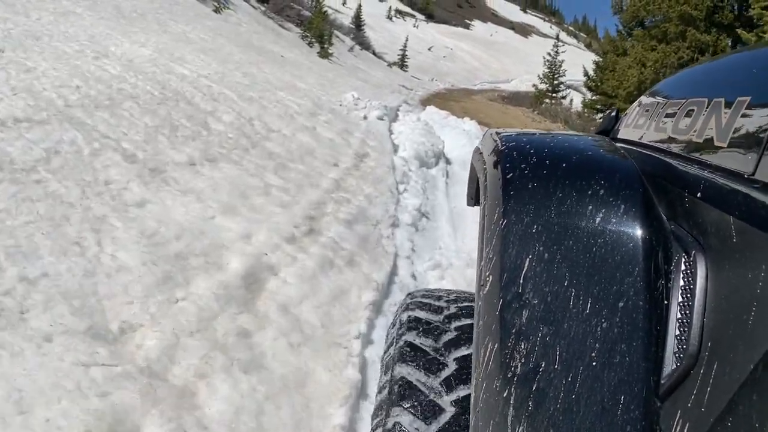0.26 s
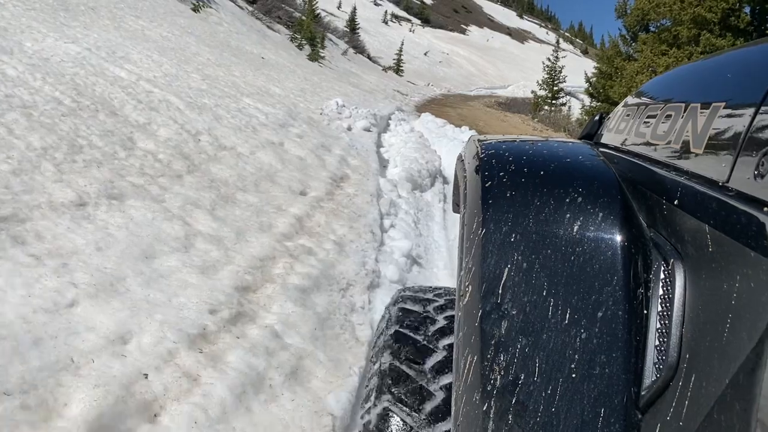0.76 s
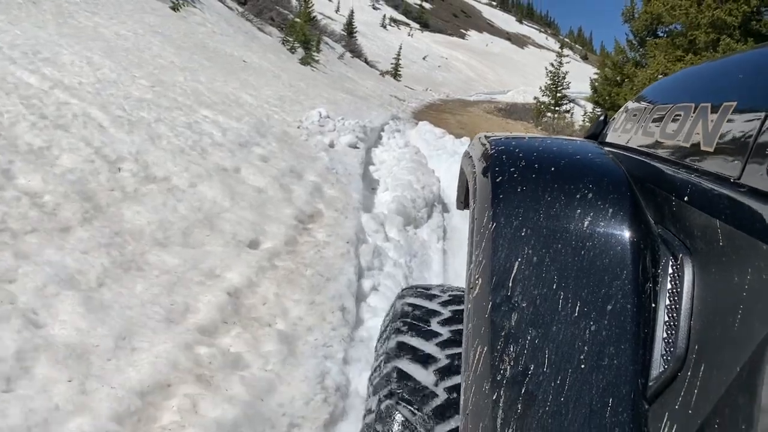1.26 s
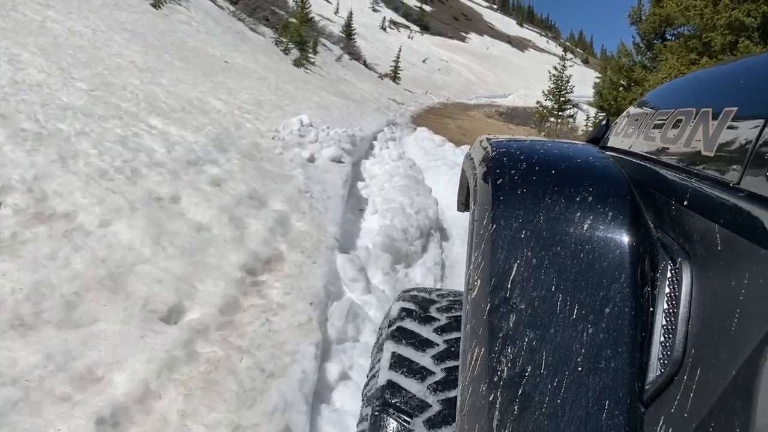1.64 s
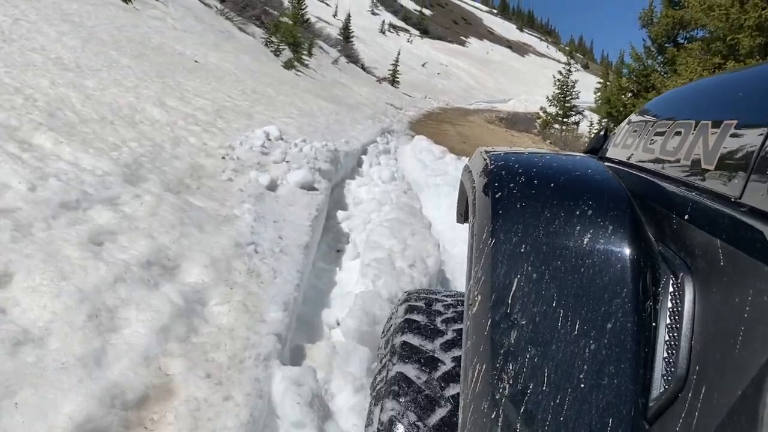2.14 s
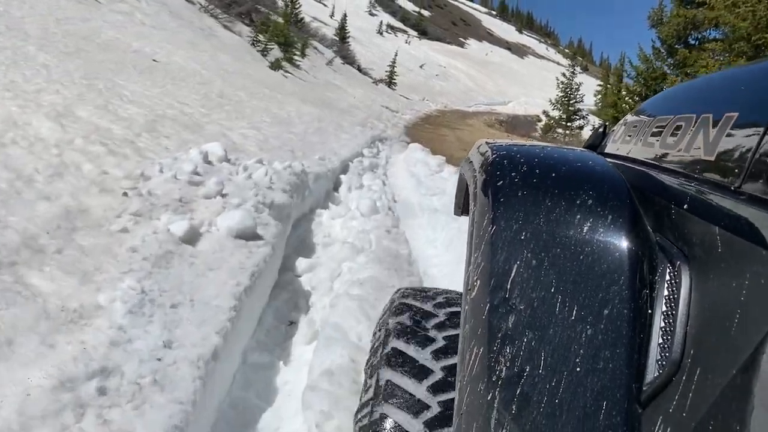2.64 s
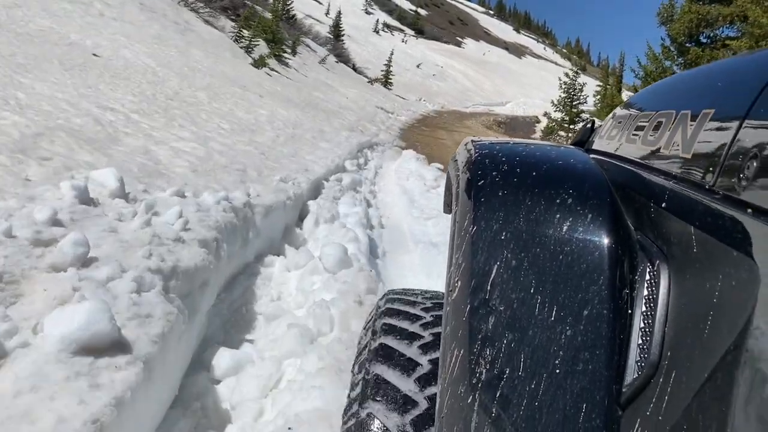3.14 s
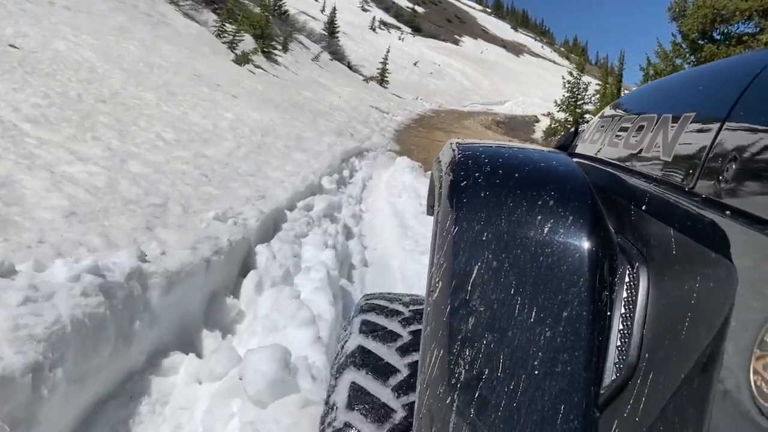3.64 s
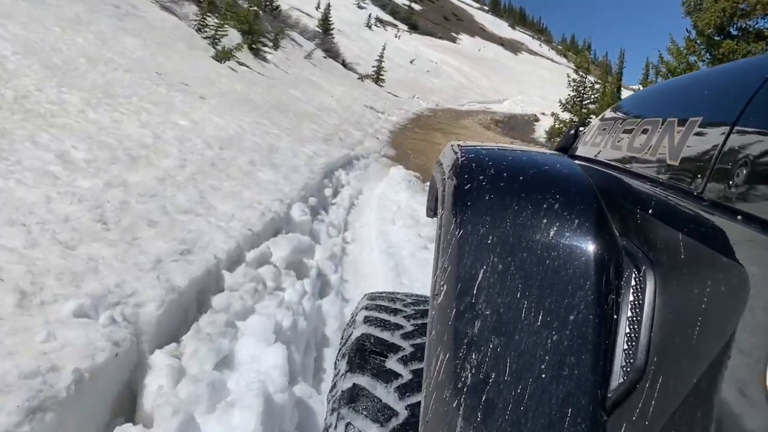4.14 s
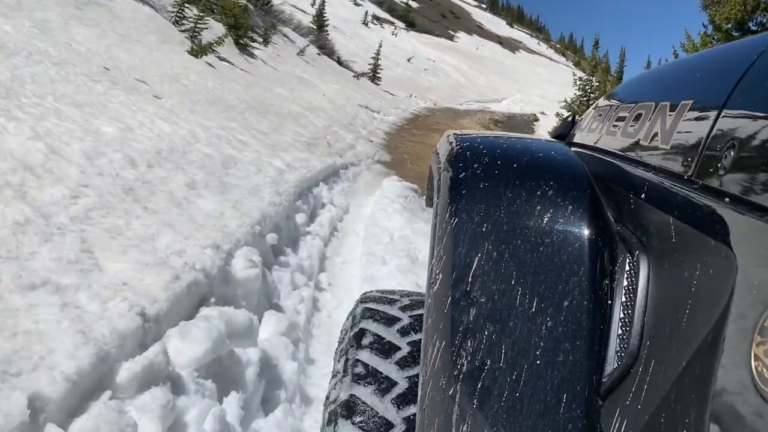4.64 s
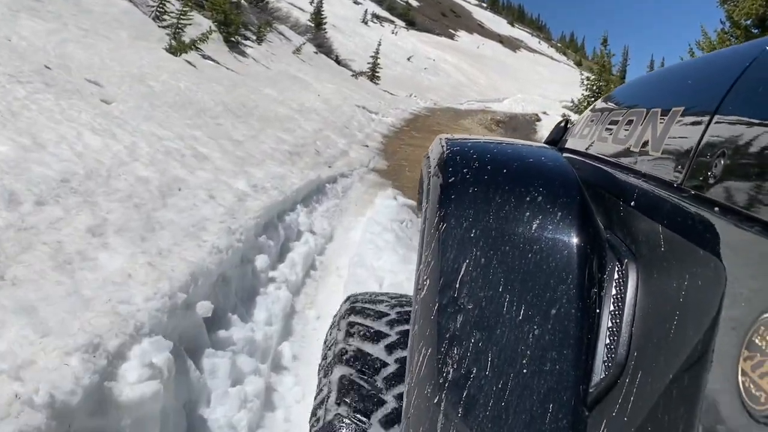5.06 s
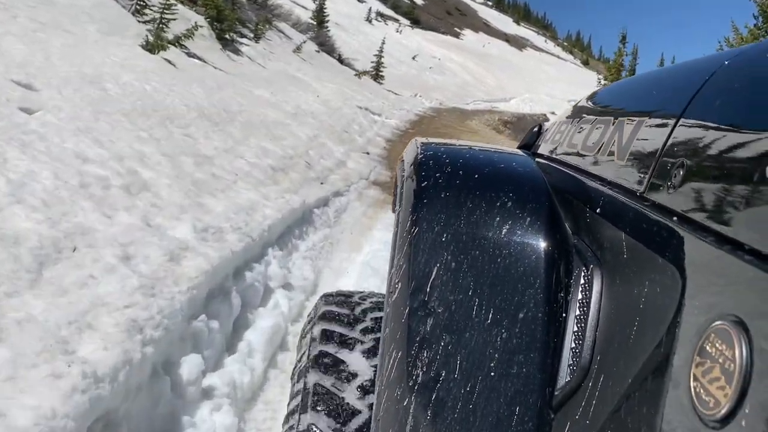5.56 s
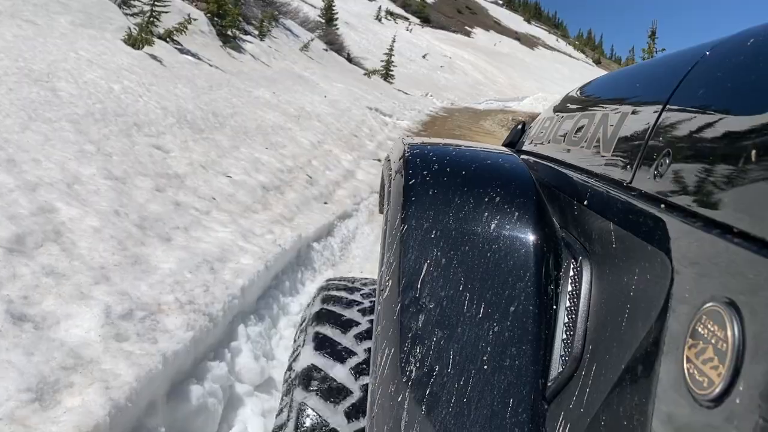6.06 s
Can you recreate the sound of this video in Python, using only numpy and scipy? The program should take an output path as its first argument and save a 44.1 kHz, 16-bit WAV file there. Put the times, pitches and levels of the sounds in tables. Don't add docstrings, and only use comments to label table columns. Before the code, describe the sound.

A six-cylinder engine pulls briefly then drops to idle as a tyre growls through packed snow and wind buffets the microphone.

```python
import sys
import numpy as np
from scipy import signal
from scipy.fft import rfft, irfft
from scipy.io import wavfile
from scipy.ndimage import uniform_filter1d

SR = 44100
rng = np.random.default_rng(int(sys.argv[2]) if len(sys.argv) > 2 else 0)


def waveform_to_disk(signal):
    frames = np.transpose(np.atleast_2d(signal))
    scaled = np.clip(frames, -1, 1) * 32767
    samples = np.round(scaled).astype(np.int16)
    wavfile.write(sys.argv[1], SR, samples)


def volts_from_db(level):
    exponent = np.asarray(level, float) / 20
    return 10 ** exponent


N = 277830

# start_s, turns_per_s
CRANK_SPEED = [(0, 18.7), (.16, 18.8), (.3, 18.95), (.46, 19.15), (.6, 19.27), (.78, 19.1), (.98, 18.7),
               (1.12, 18.0), (1.26, 17.0), (1.44, 15.9), (1.52, 15.45), (1.77, 15.0), (1.91, 14.4),
               (2.05, 13.9), (2.2, 13.6), (3.0, 13.35), (4.5, 13.45), (6.3, 13.5)]


def crankshaft():
    turns, = in_time(CRANK_SPEED)
    return turns, 2 * np.pi * np.cumsum(turns) / SR


# multiple_of_crank, level_db
LOW_ORDERS = [(2, -41), (3, -2), (4, -20)]
# multiple_of_crank, pulling_db, coasting_db
UPPER_ORDERS = [(5, 2, 0), (6, -8, -10), (7, -24, -22), (8, -9, -3), (9, -17, -18), (10, -10, -14),
                (11, 0, -12), (12, -4, -12), (13, -4, 0), (14, -6, -14), (16, 0, -9), (17, -4, -14),
                (19, -13, 0), (20, -9, -14), (21, -3, -10), (22, -10, -12), (24, -2, -20), (30, -11, -20)]
# start_s, level_db
LOW_LEVEL = [(0, -10.5), (.16, -8.5), (.24, -25), (.33, -11.5), (.6, -10.5), (.78, -18), (.9, -14),
             (1.1, -13), (1.3, -20), (1.5, -26), (1.8, -29), (2.2, -26), (3.5, -42), (4.9, -26), (5.2, -44),
             (6.3, -37)]
# start_s, level_db
UPPER_LEVEL = [(0, -35.5), (1.3, -35), (1.45, -38), (1.6, -44), (1.9, -52), (6.3, -52)]
# pitch_hz, width_hz, boost_db
EXHAUST_MODES = [(134.0, 26.0, 17), (458.0, 30.0, 4)]


def engine(crank):
    lift_off_s, lift_off_length_s = .8, .42
    closed = np.clip((np.arange(N) / SR - lift_off_s) / lift_off_length_s, 0, 1) ** 2

    def order_stack(orders, level):
        stack = 0
        for order, pull_db, coast_db in orders:
            start = rng.uniform(0, 2 * np.pi)
            lean_db = rng.normal(.5, 1.5) * (order > 4)
            strength = drift(3.0, db=1.2) * volts_from_db(pull_db + (coast_db - pull_db) * closed)
            tone = strength * np.sin(order * crank + start)
            stack = stack + tone * volts_from_db([[lean_db], [-lean_db]])
        return np.sqrt(2) * volts_from_db(in_time(level)[0]) * stack

    low = order_stack([(order, db, db) for order, db in LOW_ORDERS], LOW_LEVEL)
    upper = order_stack(UPPER_ORDERS, UPPER_LEVEL)
    return low + lifted(upper, EXHAUST_MODES)


# start_s, load_0_to_1
LOAD = [(0, 0.63), (.3, 0.77), (.6, 0.96), (1.05, 1.03), (1.22, 0.87), (1.42, 0.47), (2.1, 0.26),
        (2.6, 0.18), (4.9, 0.07), (5.1, 0.45), (5.4, 0.16), (6.3, 0.01)]
# pitch_hz, density_db_per_hz
BAY_COLOUR = [(500, -0.5), (700, -2), (1000, -3.5), (1350, -7.5), (1600, -8.5), (1880, -7), (2300, -11),
              (2800, -11), (3800, -14), (5000, -26), (6000, -14), (7500, -24), (9000, -30)]
# pitch_hz, width_hz, boost_db
BAY_MODES = [(1205, 30, 4), (1550, 90, 7), (1670, 70, 6), (1860, 110, 7), (2120, 160, 6), (3720, 70, 8),
             (4730, 200, 4)]


def bay(turns, crank):
    load, = in_time(LOAD)
    revs = np.clip((turns - 13.5) / 5.5, 0, 1)
    turn_beat = (.2 + .7 * revs) * (np.cos(crank) + .7 * np.cos(2 * crank))
    beat = volts_from_db(turn_beat + .9 * np.cos(3 * crank))
    plain = banded(BAY_COLOUR, grainy(3000, spread_db=3.5, smooth=1.4), patchy_db=.25)
    ringing = lifted(plain, BAY_MODES)
    clatter = plain + (.45 + .55 * revs) * (ringing - plain)
    treble = filtered(clatter, 2, 3300, "high")
    noise = rms_one(beat * (clatter + 0.47 * np.clip(load, 0, 2) ** 2 * treble))
    idle_db, load_db, fade_db_per_s = -36.5, 7, 0.39
    return volts_from_db(idle_db + load_db * load - fade_db_per_s * np.arange(N) / SR) * noise


# start_s, pitch_hz, level_db
GEAR = [(0, 1828, -41), (.12, 1840, -50), (.65, 1870, -43), (1.0, 1845, -46), (1.25, 1862, -46),
        (1.4, 1840, -54), (1.65, 1820, -48), (2.0, 1825, -53), (4.2, 1822, -52), (5.25, 1820, -48),
        (5.55, 1822, -54), (6.1, 1820, -49), (6.3, 1815, -50)]
# centre_s, pitch_hz, level_db, length_s
SINGS = [
    (.22, 1203, -46, .3),
    (.25, 1535, -47, .15),
    (.85, 1540, -48, .3),
    (.97, 1662, -46, .3),
    (5.19, 1600, -51, .1),
    (5.7, 1580, -54, .35),
]


def gear():
    hz, db = in_time(GEAR)
    out = volts_from_db(db) * drift(12.0, db=2.0) * np.sin(2 * np.pi * np.cumsum(hz) / SR + .9 * drift(8.0))
    for s, hz, db, length_s in SINGS:
        swell = bumps(np.array([s]), volts_from_db([db]), length_s)
        out = out + swell * np.sin(2 * np.pi * hz * np.arange(N) / SR + .8 * drift(6.0))
    return np.sqrt(2) * out * volts_from_db([[1.3], [-1.3]])


WHINE_HZ = [268.0, 474.0, 2170]
# wander_hz, level_db
WHINES = [(1.0, -38), (1.0, -40.5), (30, -56.5)]
# start_s, level_db
WHINE_LOAD = [(0, 2), (.5, 0.5), (1.0, 1.5), (1.6, 1), (2.5, 2.5), (4.7, 2), (5.25, 1), (5.5, -24),
              (6.3, -7)]


def whines():
    t = np.arange(N) / SR
    tones = 0
    for hz, (wander_hz, db) in zip(WHINE_HZ, WHINES):
        strength = volts_from_db(db) * drift(5.0, db=1.5)
        tones = tones + strength * np.sin(2 * np.pi * hz * t + 1.3 * drift(wander_hz))
    return np.sqrt(2) * tones * volts_from_db(in_time(WHINE_LOAD)[0]) * volts_from_db([[1.2], [-1.2]])


# start_s, spray_db, crush_db
ROLL = [(0.0, -49, -31), (0.02, -49, -31.5), (0.97, -47.5, -32), (1.39, -51, -31), (1.72, -50.5, -31.5),
        (2.39, -52, -32.5), (2.63, -50, -31), (3.19, -48.5, -32), (3.7, -49, -31), (3.83, -52.5, -33),
        (4.35, -48.5, -30.5), (4.93, -52.5, -31), (5.03, -48.5, -29), (5.21, -48.5, -35.5),
        (5.49, -50, -31.5), (5.77, -49.5, -30), (6.21, -52.5, -29.5), (6.3, -47.5, -27)]
# pitch_hz, density_db_per_hz
SNOW_COLOUR = [(210, -7), (270, -13), (400, -8.5), (500, -19.5), (640, -21), (900, -26), (1400, -37),
               (2000, -50)]
# pitch_hz, density_db_per_hz
SPRAY_COLOUR = [(4000, 4), (5600, -3), (7500, 3), (11000, 5.5), (14000, 3), (16000, -2)]
# centre_s, lift_db, length_s
CLUMPS = [
    (2.3, 3, .06),
    (2.744, 2.5, 0.065),
    (3.082, 5, 0.041),
    (5.02, 1.5, 0.048),
    (5.57, 2.5, 0.091),
]


def tyre():
    spray_db, crush_db = in_time(ROLL)
    snow = banded(SNOW_COLOUR, grainy(500, spread_db=3.5, smooth=1.0), patchy_db=0.4)
    crush = volts_from_db(crush_db + 1.83) * filtered(snow, 4, 205, "high")
    hiss = banded(SPRAY_COLOUR, grainy(2500, spread_db=2.5, smooth=1.2), patchy_db=0.5)
    return crush + volts_from_db(spray_db + 7 + bumps(*np.transpose(CLUMPS))) * hiss


# start_s, eddy_rate_hz, strength_db
WIND = [(0, 56.6, -37), (.25, 57, -8), (.6, 56.93, -11.5), (1.1, 57.76, -17.5), (1.5, 68.1, -15.5),
        (2.2, 67, -15), (2.65, 71, -14.5), (3.1, 63.07, -16), (3.6, 59.17, -13.5), (4.0, 68, -13.5),
        (4.42, 69.8, -13.5), (4.85, 59.5, -14.5), (5.03, 67, -14), (5.1, 67.4, -25), (5.45, 69.04, -21),
        (6.0, 59.87, -22.5), (6.26, 63, -21.5), (6.3, 63.5, -17)]
# centre_s, depth_db, length_s
LULLS = [(1.3, -12, 0.022), (1.588, -4, 0.026), (1.712, -5, 0.023), (1.785, -6, 0.045), (1.89, -2, 0.023),
         (1.987, -8, 0.024), (2.159, -15, 0.013), (2.232, -19, 0.039), (2.427, -11, 0.023),
         (2.843, -4, 0.021), (2.962, -1.5, 0.02), (3.151, -4, 0.031), (3.325, -11.0, 0.024),
         (3.548, -6, 0.032), (3.633, -15, 0.021), (3.88, -28, 0.032), (4.399, 1, 0.029), (4.481, -4, 0.046),
         (4.658, -13, 0.021), (4.756, -13, 0.016), (4.951, -8, 0.034), (5.112, 1.5, 0.033),
         (5.22, -8.0, 0.015), (5.367, -0.5, 0.06), (5.568, -9.0, 0.027), (5.698, -15, 0.026),
         (5.82, -9, 0.019), (5.885, -17, 0.021), (6.085, -15, 0.017), (6.172, -11, 0.022)]
# centre_s, peak_db, length_s
LUMPS = [(1.13, -20, 0.13), (1.29, -18.5, 0.036), (1.52, -19, 0.054), (1.613, -25, 0.046),
         (1.753, -14.5, 0.049), (1.819, -16.5, 0.038), (1.958, -19, 0.029), (2.017, -15.5, 0.036),
         (2.147, -14, 0.043), (2.405, -5.5, 0.017), (2.5, -17.5, 0.06), (2.74, -15, 0.043),
         (2.792, -15, 0.023), (2.853, -13, 0.03), (2.908, -13, 0.052), (3.078, -14.5, 0.045),
         (3.179, -14, 0.059), (3.381, -21, 0.06), (3.539, -11.5, 0.045), (3.865, -12.5, 0.077),
         (4.284, -14, 0.039), (4.334, -8.5, 0.026), (4.613, -11.5, 0.063), (4.742, -17, 0.03),
         (4.79, -14.5, 0.041), (4.989, -16, 0.037), (5.03, -7.5, 0.02), (5.58, -19.5, 0.043),
         (5.688, -20, 0.045), (5.978, -24.5, 0.19), (6.169, -23, 0.062)]
# centre_s, peak_db
FLUTTERS = [(1.595, -23), (1.742, -18.5), (1.909, -18.5), (2.08, -23), (2.189, -18.5), (2.399, -26),
            (2.638, -23), (2.742, -18), (2.824, -23), (2.906, -17.5), (3.065, -38), (3.282, -15),
            (3.391, -21), (3.532, -32), (3.752, -16.5), (4.122, -26), (4.262, -19.5), (4.352, -15),
            (4.612, -19.5), (4.772, -20), (4.895, -14.5), (5.03, -12), (5.144, -20.5), (5.401, -35),
            (5.706, -29), (5.76, -25), (5.868, -21), (6.013, -22), (6.09, -23), (6.168, -20), (6.25, -23)]


def buffet():
    t = np.arange(N) / SR
    eddy_hz, wind_db = in_time(WIND)
    rising = np.clip((t - .95) / .15, 0, 1)
    later = np.clip((t - .9) / .7, 0, 1)
    steady = volts_from_db(wind_db + 1.8 * bumps(*np.transpose(LULLS)))

    s, db, length_s = np.transpose(LUMPS)
    lump_gust = np.hypot(bumps(s, volts_from_db(db + 1.0), 0.72 * length_s), volts_from_db(wind_db - 6))
    s, db = np.transpose(FLUTTERS)
    flutter_gust = np.hypot(bumps(s, volts_from_db(db - 2.0), .033), volts_from_db(wind_db - 20))

    eddy_phase = 2 * np.pi * np.cumsum(eddy_hz + 2.5 * drift(4.0)) / SR
    port_phase = .4 * drift(9.0) + .14 * drift(6.0) * [[1], [-1]]
    drone = np.sqrt(2) * np.sin(eddy_phase + port_phase)
    lumps = lump_gust * evened(102.0, 22.5, 0.84)
    flutter = flutter_gust * later * evened(172.0, 40.0, 0.63)
    rush = steady * volts_from_db(-5.5) * narrow(64.0, 15.6, 0.9)
    heave = rising * volts_from_db(wind_db - 8.5) * narrow(50.0, 4.7, 1.0)
    air = rising * (steady * drone + lumps + flutter) + rush + heave
    return filtered(air, 3, 31, "high") * volts_from_db([[.2], [-.2]])


# start_s, peak_db, pitch_hz, bright_flick_db
PUFFS = [(1.363, -23, 205, -14), (1.551, -15.5, 264, -19), (1.735, -18, 191, -3), (1.885, -13.5, 236, -14),
         (1.9, -8, 213, -19), (1.938, -14.5, 355, -29), (2.069, -12.5, 200, -27), (2.185, -22, 265.8, -6),
         (2.548, -11, 224, -32), (2.906, -13, 295, -30), (3.272, -9.5, 212.4, -16), (3.527, -6, 201, -22),
         (3.567, -13, 209, -30), (3.842, -12.5, 263, -19), (4.114, -7.5, 216.3, -28),
         (4.259, -8.5, 187.8, -9), (4.315, -9.5, 192, -6.5), (4.657, -14, 360, -23),
         (4.784, -10.5, 287, -24), (4.816, -12, 278, -14), (4.89, -5, 203, -17), (4.92, -13.5, 266, -35),
         (5.008, -5, 186, -22), (5.138, -9, 260.3, 1.5), (5.395, -15, 222.8, -13), (5.636, -19.5, 273, -16),
         (5.867, -9.5, 235, -6), (6.085, -14.5, 262, 1.5), (6.128, -19, 281, -22), (6.159, -14, 220, 1)]
# start_s, peak_db, pitch_hz
FURTHER_PUFFS = [(1.213, -17, 335), (1.248, -16.5, 372), (1.506, -17, 210), (1.656, -19, 213),
                 (2.139, -23, 191), (2.17, -19, 218), (2.323, -16, 202), (2.572, -18, 328), (2.737, -15, 210),
                 (2.779, -20, 220.8), (2.864, -21, 326), (2.959, -16, 256), (3.085, -20, 269),
                 (3.386, -13.5, 227), (3.435, -24, 272), (3.745, -24, 191), (3.873, -12, 191),
                 (4.225, -26, 262), (4.466, -25, 285), (4.506, -17, 256.5), (4.545, -16, 250),
                 (4.57, -13.5, 191), (4.718, -19, 363), (4.77, -13, 272), (5.235, -23, 266),
                 (5.567, -24, 307), (5.817, -22, 353.2), (5.943, -21, 353), (5.981, -19, 231),
                 (6.236, -20, 198.7)]


def puffs():
    out = np.zeros((2, N + SR))
    every = [*PUFFS, *((s, db, hz, -22) for s, db, hz in FURTHER_PUFFS)]
    chance = rng.uniform(-0.87, 1, (len(every), 4))
    flick_from_hz, flick_to_hz, flick_s = 950, 200, .009
    for (s, db, hz, flick_db), (start, flick, apart, lean) in zip(every, chance):
        length_s = .013 * (250 / hz) ** .15
        t = np.arange(int(length_s * SR)) / SR
        u = t / length_s
        glide = 2 * np.pi * np.cumsum(hz * np.exp(1.5 * (.45 - u))) / SR
        port_phase = np.pi * (1.306 + 0.39 * start) + 0.98 * apart * np.array([[1], [-1]])
        puff = np.sin(np.pi * u ** 0.74) ** 2 * np.sin(glide + port_phase)
        v = np.minimum(t / flick_s, 1)
        fall = 2 * np.pi * np.cumsum(flick_from_hz * (flick_to_hz / flick_from_hz) ** v) / SR
        bright = np.sin(np.pi * v) ** 2 * np.sin(fall + np.pi * flick)
        at, pan_db = int(s * SR), 2 + 1.5 * lean
        both = volts_from_db(db) * (puff + volts_from_db(flick_db) * bright)
        out[:, at:at + len(t)] += both * volts_from_db([[pan_db / 2], [-pan_db / 2]])
    return out[:, :N]


# start_s, peak_db, pitch_hz
FLICKS = [
    (1.912, -22, 596),
    (4.341, -15.5, 590),
    (5.012, -22, 980),
    (5.015, -17, 580),
    (6.077, -25, 754),
    (6.14, -16, 452),
    (6.292, -17, 502),
]


def flicks():
    out = np.zeros(N + SR)
    t = np.arange(int(0.011 * SR)) / SR
    swell = np.sin(np.pi * t / t[-1]) ** 2
    for s, db, hz in FLICKS:
        out[int(s * SR):][:len(t)] += volts_from_db(db) * swell * np.sin(2 * np.pi * hz * t * (1.2 - 40 * t))
    return out[:N] * volts_from_db([[1.2], [-1.2]])


def rms_one(x):
    return x / np.sqrt(np.mean(x ** 2) + 1e-20)


def filtered(x, order, hz, kind):
    return signal.sosfilt(signal.butter(order, hz, kind, fs=SR, output="sos"), x)


def in_time(rows):
    s, *columns = np.transpose(rows)
    return [np.interp(np.arange(N) / SR, s, c) for c in columns]


def at_hz(points, hz):
    point_hz, value = np.transpose(points)
    return np.interp(np.log(hz), np.log(point_hz), value)


def bumps(s, height, length_s):
    t = np.arange(0, N + 100, 100) / SR
    away = (t[:, None] - s) / np.maximum(length_s, .01)
    bells = np.exp(-4 * np.log(2) * away ** 2) @ height
    return np.interp(np.arange(N) / SR, t, bells)


def drift(rate, db=None):
    r = np.exp(-80 * np.pi * rate / SR)
    slow = signal.lfilter([1], [1, -2 * r, r * r], rng.standard_normal(N // 40 + 2002))[2000:]
    slow = rms_one(slow - slow.mean())
    return np.interp(np.arange(N) / 40, np.arange(len(slow)), slow if db is None else volts_from_db(db * slow))


def narrow(hz, width_hz, alike):
    turn = 2 * np.pi * np.cumsum(hz + np.zeros(N)) / SR
    mid, side = (drift(width_hz) * np.cos(turn) + drift(width_hz) * np.sin(turn) for _ in range(2))
    return (np.sqrt(1 + alike) * mid + np.sqrt(1 - alike) * side * [[1], [-1]]) / np.sqrt(2)


def evened(hz, width_hz, alike):
    lumps = filtered(narrow(hz, width_hz, alike), 2, [hz / 1.41, hz * 1.38], "band")
    swell = np.sqrt(uniform_filter1d(lumps.mean(axis=0) ** 2, size=900))
    return rms_one(lumps / (0.91 + swell))


def lifted(x, modes):
    out = x
    for hz, width_hz, db in modes:
        out = out + (volts_from_db(db) - 1) * signal.lfilter(*signal.iirpeak(hz, hz / width_hz, fs=SR), x)
    return out


def grainy(per_s, spread_db, smooth):
    cracks = np.zeros(4 * N)
    at = rng.integers(0, 4 * N, int(4 * N * per_s / SR))
    size = volts_from_db(spread_db * np.minimum(rng.exponential(1, len(at)), 5))
    cracks[at] = size * rng.choice([-1, 1], len(at))
    return (rms_one(cracks) + smooth * rng.standard_normal(4 * N)).reshape(2, 2, N)


# pitch_hz, likeness_0_to_1
LIKENESS = [(60, .9), (150, .6), (380, .66), (950, .79), (2400, .79), (4500, .82), (7500, .88),
            (15000, .91)]
# pitch_hz, left_over_right_db
LEAN = [(60, 0.3), (150, 4), (380, 2), (950, 1), (2380, 3), (5600, 9.5), (8600, -1.6), (15000, 1)]


def banded(spectrum, white, patchy_db):
    out = 0
    lowest, highest = spectrum[0][0], spectrum[-1][0]
    edges = lowest * 2 ** np.arange(0, np.log2(highest / lowest) + .2, .4)
    for k, (low, high) in enumerate(zip(edges, edges[1:])):
        mid, side = filtered(white[k % 2], 2, [low, high], "band")
        hz = np.sqrt(low * high)
        share = np.clip(at_hz(LIKENESS, hz), 0, 1)
        level = volts_from_db(at_hz(spectrum, hz) + at_hz(LEAN, hz) * np.array([[.5], [-.5]]))
        mid, side = np.sqrt(1 + share) * mid, np.sqrt(1 - share) * side
        out = out + drift(9.3, db=2.3 * patchy_db) * level * [mid + side, mid - side]
    return rms_one(out * drift(26.0, db=0.52 * patchy_db))


def scene():
    turns, crank = crankshaft()
    machine = engine(crank) + bay(turns, crank) + gear() + whines()
    return machine + tyre() + buffet() + puffs() + flicks()


def top_cut(x):
    return signal.sosfilt(signal.butter(12, 15810, fs=SR, output="sos"), x)


def record(dry):
    port_lag_s, in_phase_hz = 1 / 4300.0, 6850
    hz = np.arange(N // 2 + 1) * SR / N
    late = np.exp(-2j * np.pi * np.maximum(hz - in_phase_hz, 0) * port_lag_s)
    ports = np.array([irfft(rfft(dry[0]) * late, N), dry[1]])
    mix = 1.444 * np.tanh(ports / 1.546)
    return top_cut(mix)


dry = scene()
out = record(dry)
waveform_to_disk(out)
```